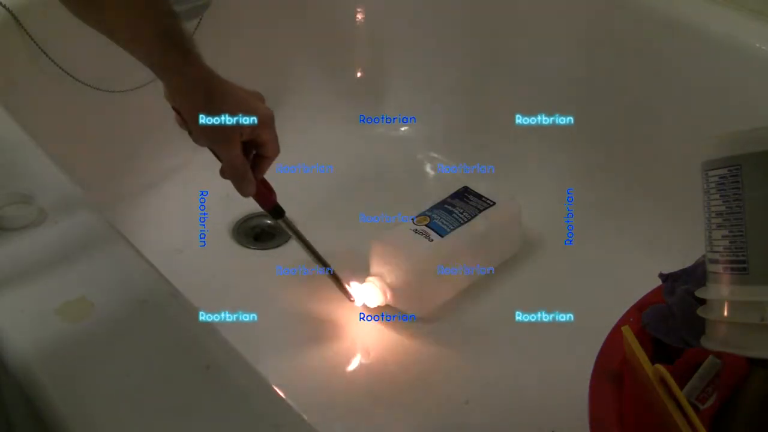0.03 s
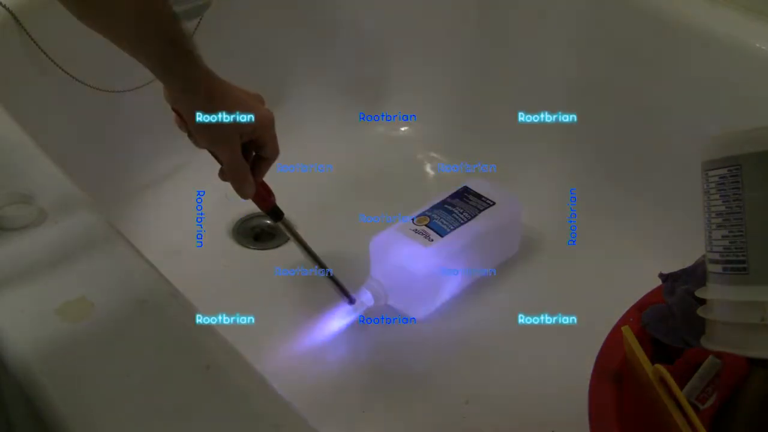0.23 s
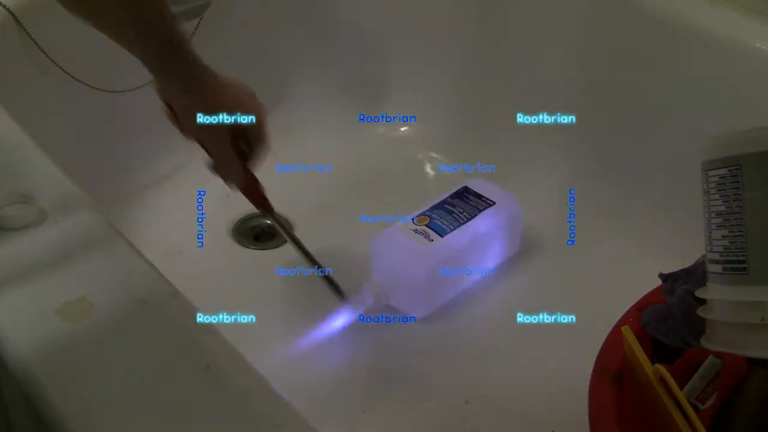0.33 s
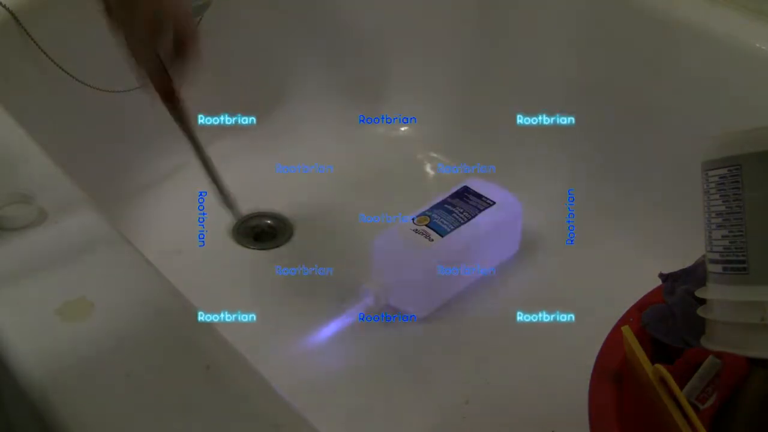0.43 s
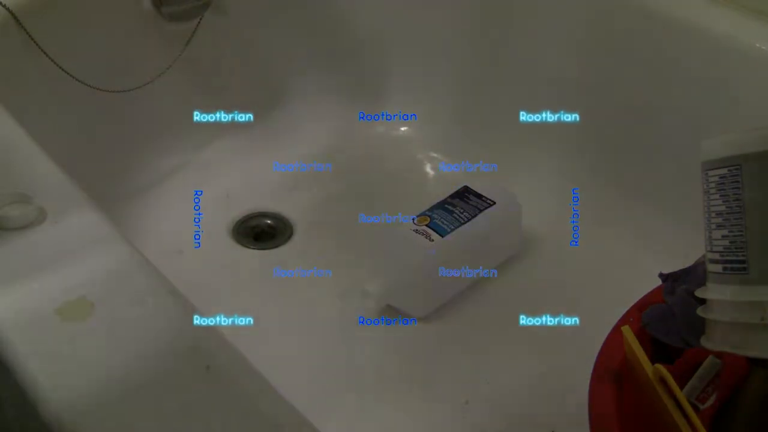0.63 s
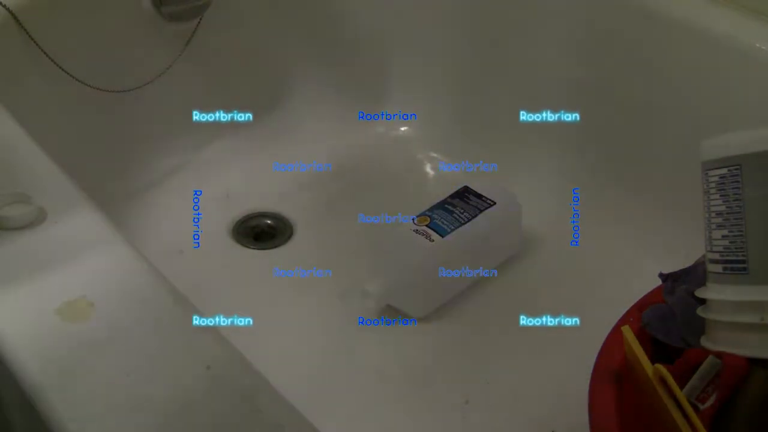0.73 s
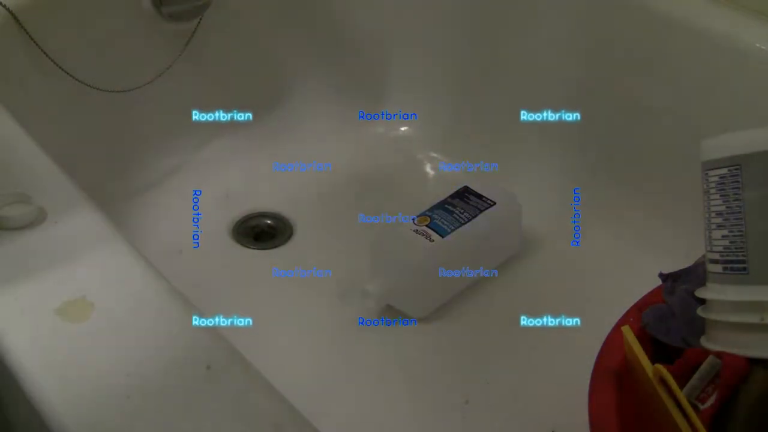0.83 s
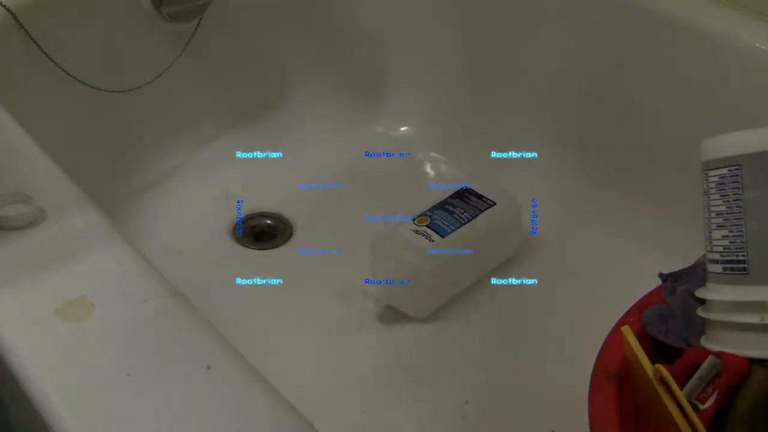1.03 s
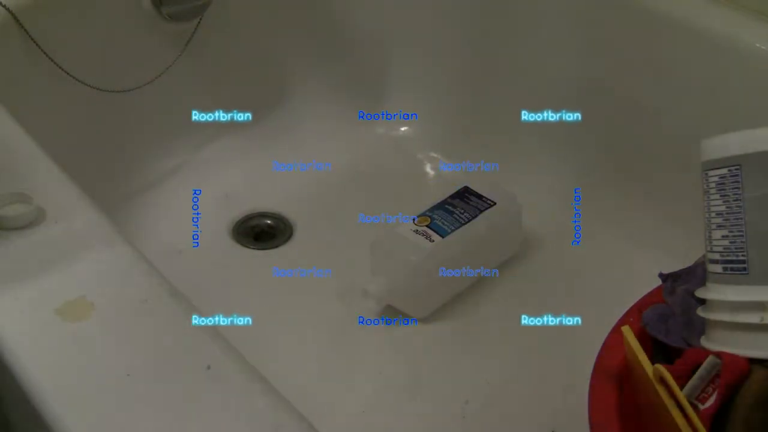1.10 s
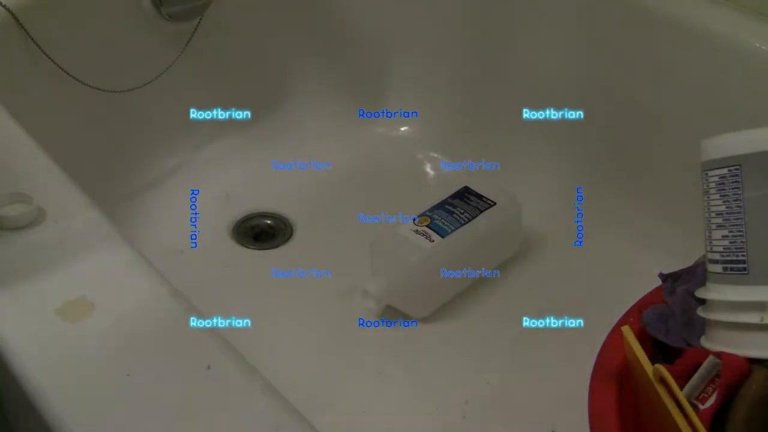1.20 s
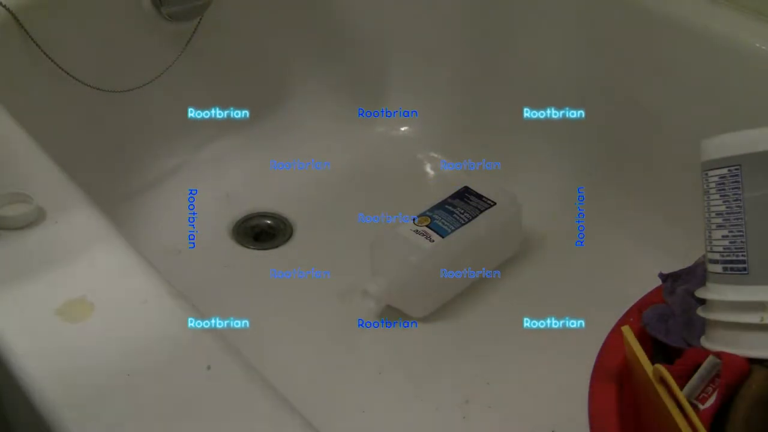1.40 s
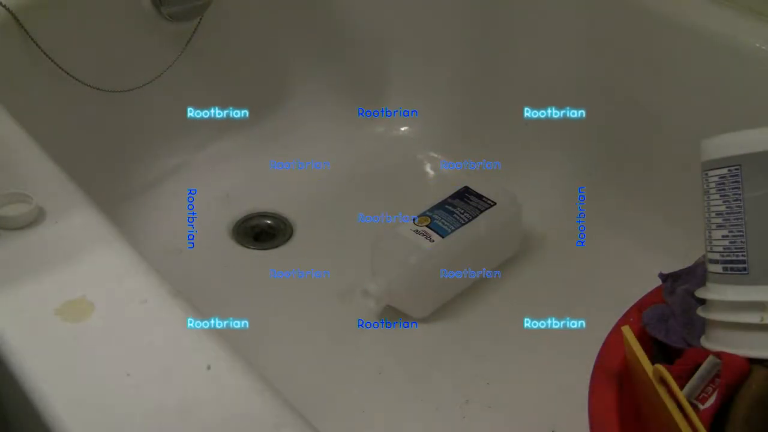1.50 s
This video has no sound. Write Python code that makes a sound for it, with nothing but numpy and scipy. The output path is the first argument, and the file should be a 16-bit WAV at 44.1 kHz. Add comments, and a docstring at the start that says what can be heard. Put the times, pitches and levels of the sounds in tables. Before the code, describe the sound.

A flame jet bursts from a plastic bottle at about 0.2 seconds, a low, hollow whoosh with a hissing edge that lasts a third of a second. The plastic clicks as it dies away around 0.5 seconds. Air hisses faintly back in near 0.75 seconds, and one sharper click comes just after 1 second. A fan hums quietly throughout in the small tiled bathroom.

```python
"""A flame jet roars for a third of a second as vapour ignites in a plastic bottle lying in a bathtub.
Just ahead of it come a tiny click and a faint hollow tone; then gas rushes from the neck and rings the
hollows of bottle and tub. The plastic clicks as it heats and cools, and air hisses faintly back in.
A fan hums in the small tiled room, and an automatic gain control ducks the mix under the roar."""
import sys
import numpy as np
from scipy import signal
from scipy.fft import rfft, irfft, next_fast_len
from scipy.io import wavfile
from scipy.ndimage import uniform_filter1d, map_coordinates

SR = 44100
rng = np.random.default_rng(int(sys.argv[2]) if len(sys.argv) > 2 else 0)


def unload_wav(signal):
    """Save mono or channel-first audio to the path in sys.argv[1] as 16-bit WAV at rate SR, clipped to [-1, 1]."""
    wavfile.write(
        sys.argv[1],
        SR,
        np.round(np.clip(np.atleast_2d(signal).T, -1, 1) * 32767).astype(np.int16),
    )


N = 68355

# Envelope of the flame jet: time_s, level_db
JET_FLOW = [(.197, -52), (.206, -22.5), (.216, -13), (.236, -9.5), (.26, -8.5), (.33, -8.5), (.425, -8.5),
            (.452, -9), (.495, -16.5), (.525, -34), (.57, -61)]
# Noise colours of the first push of gas, the roar and the hiss: frequency_hz, relative_db
BOOM_COLOUR = [(30, -41), (70, -7.5), (120, -8), (180, -14), (240, 3.5), (330, -0.5), (480, 0), (600, -8),
               (1000, -48)]
ROAR_COLOUR = [(150, -41), (400, -2), (700, -0.5), (900, 1), (1100, 2.5), (1200, -5), (1400, -1.5),
               (1720, -2), (1830, -14.5), (2300, -18.5), (3200, -16), (5000, -56)]
HISS_COLOUR = [(900, -26), (2000, 8), (2300, 1.5), (2550, 6), (2900, -2.5), (4200, -6), (5500, -8),
               (7500, -15.5), (9800, -26), (12500, -22.5), (16000, -28)]
# Air resonances of bottle and tub: pitch_hz, bandwidth_hz, relative_db, peak_s, half_span_s
HOLLOW_MODES = [(122.5, 12, -18, 0.272, 0.043), (105, 30, -18.5, 0.532, 0.083),
                (251, 24, -13, 0.374, 0.065), (218, 20, -12, .49, 0.033), (331.5, 28, -10.5, 0.25, .06),
                (445.7, 26, -10, 0.223, 0.044), (479.7, 26, -2, 0.531, 0.045),
                (586.5, 14, -6, 0.414, 0.038), (657, 17.83, -8, 0.37, 0.076),
                (682.4, 16.3, -6.5, 0.407, 0.025), (715, 14.14, -12, 0.39, .13),
                (798.6, 39, -14, 0.34, 0.095), (968, 14, -14.5, 0.33, .1), (995, 11.7, -16, 0.333, .08),
                (1049, 13.8, -18.5, 0.46, .12), (1377, 30, -17.5, .39, 0.099),
                (1434, 18.3, -18.5, 0.39, 0.08), (1670, 10, -13, .28, .11), (1980, 24, -24, 0.17, 0.14),
                (2490, 40, -22.5, 0.29, 0.11)]
# Clicks of the plastic: start_s, low_ring_db, middle_ring_db, high_ring_db, snap_db
PLASTIC_CLICKS = [(.111, -49, -55.5, -68, -53), (0.4662, -25, -29.5, -32, -25),
                  (0.5337, -26, -36.5, -48, -25), (0.5412, -31.5, -38, -52, -27),
                  (.774, -60, -54, -64, -43), (0.783, -66, -57, -62, -43), (0.9998, -46, -55, -66, -42),
                  (1.0592, -40.5, -41.5, -36.5, -19.5), (1.134, -60, -60, -52, -54),
                  (1.1407, -55, -49, -52, -49)]
# Modes of a click's opening snap: pitch_hz, relative_db, t60_s
SNAP_MODES = [(3250, -13, .008), (5200, -6, .001), (7000, -6, .001), (13800, -1, .0007)]
# Colours of a click's low, middle and high ring, one list each: frequency_hz, relative_db
RING_COLOURS = [
    [(1000, -35), (2000, -4), (2600, 2.5), (3250, -5), (4000, -0.5), (5400, -2.5), (7000, -24)],
    [(4500, -10.5), (6200, 4), (7700, -2), (9000, -13), (11000, -33)],
    [(8500, -19.5), (11000, -7.5), (13500, -4), (16000, -3.5)],
]
# Envelope of the air drawn back in: time_s, level_db
INRUSH_ENVELOPE = [(.6, -61), (.7, -52.5), (.775, -51), (.86, -58), (1, -59.5)]
# Colour of that air: frequency_hz, relative_db
AIR_COLOUR = [(1500, 2), (3500, -0.5), (7500, -5.5), (10000, -13.5), (15000, -16)]
# Colour of the fan's air noise: frequency_hz, relative_db
FAN_COLOUR = [(25, -17), (40, -26), (64, -5), (92, -14.5), (134, 0.5), (190, -10), (250, -3.5), (350, -9),
              (470, -11.5), (660, -9), (790, -12.5), (870, -16), (1150, -15), (1440, -22.5), (1650, -18.5),
              (2400, -26), (3520, -30), (5000, -32), (6920, -42.5), (9500, -46.5), (16000, -50)]
# Envelope of the fan's air noise: time_s, level_db
FAN_ENVELOPE = [(0, -41.5), (.7, -42), (1.15, -40), (1.55, -41.5)]
# Tones of the fan motor: pitch_hz, level_db
MOTOR_TONES = [(48.6, -42), (97, -52.5), (120, -48), (143, -50), (168, -51), (216.5, -51), (242, -51.5),
               (289.5, -52), (336, -55.5), (386, -52.5)]
# Stereo widths of jet and room, clicks and inrush, and fan: frequency_hz, side_minus_mid_db
JET_WIDTH = [(60, -9), (250, -17), (600, -15), (1400, -12.5), (3000, -10), (5500, -6.5), (8000, -2),
             (10000, 2), (11500, -16), (15000, -22)]
BOTTLE_WIDTH = [(2000, -12), (5000, -6.5), (8000, 2), (13000, -14)]
FAN_WIDTH = [(60, 8), (150, -10.5), (380, -9.5), (950, -8), (2380, -5.5), (5980, -1), (15000, 2)]
# Early echoes off the tub: delay_s, gain_db
TUB_ECHOES = [(.0015, -19.5), (.0031, -18.5), (.0062, -14), (.0087, -16.5), (0.0143, -19.5)]


def flame_jet():
    """One flow of burning gas drives boom, roar, hiss and hollows; boom and hiss fade ahead of the roar."""
    middle_s, hiss_lag_s, hollow_lag_s = 0.37, 0.013, 0.0031
    from_middle_s = np.clip(clock() - middle_s, -.2, .3)

    def layer(colour, trim_db, fade_db_per_s):
        return amp(trim_db - fade_db_per_s * from_middle_s) * noise(colour, JET_WIDTH)

    boom = layer(BOOM_COLOUR, trim_db=-12.5, fade_db_per_s=30)
    roar = layer(ROAR_COLOUR, trim_db=-7, fade_db_per_s=5.5)
    hiss = layer(HISS_COLOUR, trim_db=-15.5, fade_db_per_s=42)
    flow = amp(curve(JET_FLOW))
    hiss_flow = np.minimum(flow, lag(flow, hiss_lag_s))  # late attack: hiss needs the jet at full speed
    body = lag(flow, hollow_lag_s) * hollows()
    return flow * boom + body + tub_echoes(flow * roar + hiss_flow * hiss)


def hollows():
    """Turbulence rings the air in bottle and tub, each mode swelling at its own moment of the burn."""
    return sum(amp(db) * swell(peak_s, half_span_s) * wavering_tone(hz, bandwidth_hz, flutter_db=3.9)
               for hz, bandwidth_hz, db, peak_s, half_span_s in HOLLOW_MODES)


def ignition_tone():
    """A faint hollow tone swells just before the vapour catches."""
    envelope = amp(-46.5) * swell(peak_s=0.15, half_span_s=0.037)
    return envelope * wavering_tone(hz=388, bandwidth_hz=3, flutter_db=4)


def plastic_snaps():
    """The sharp attack of each click, straight from the bottle wall."""
    low_cut_hz = 2660
    out, t = np.zeros(N), np.arange(512) / SR
    snap = sum(amp(db - 60 * t / t60_s) * np.sin(2 * np.pi * hz * t) for hz, db, t60_s in SNAP_MODES)
    for start_s, *_, snap_db in PLASTIC_CLICKS:
        out[round(start_s * SR):][:len(t)] += amp(snap_db) * snap
    return signal.sosfilt(signal.butter(4, low_cut_hz, "high", fs=SR, output="sos"), out)


def plastic_rings():
    """Just behind each snap, a short crack in three noise bands rings away between the tub's walls."""
    delay_s, attack_s, crack_s, crack_over_tail_db, tail_t60_s = 0.00085, 0.00026, 0.003, 4, 0.15
    out = np.zeros((2, N))
    for band, colour in enumerate(RING_COLOURS):
        power = np.zeros(N)
        for start_s, *levels_db in PLASTIC_CLICKS:
            t = np.maximum(clock() - start_s - delay_s, 0)
            attack = 1 - np.exp(-t / attack_s)
            crack = amp(crack_over_tail_db) * np.exp(-t / crack_s)
            tail = amp(-60 * t / tail_t60_s)
            power += (amp(levels_db[band]) * attack * (crack + tail) / 2) ** 2
        out += np.sqrt(power) * noise(colour, BOTTLE_WIDTH)
    return out


def inrush():
    """The cooling bottle draws a thin hiss of air back through its neck."""
    return amp(curve(INRUSH_ENVELOPE)) * noise(AIR_COLOUR, BOTTLE_WIDTH)


def fan():
    """A bed of moving air and motor hum; the higher tones are less steady."""
    hum = sum(amp(db) * wavering_tone(hz, bandwidth_hz=hz * hz / 30000, flutter_db=hz / 250)
              for hz, db in MOTOR_TONES)
    return hum + amp(curve(FAN_ENVELOPE)) * noise(FAN_COLOUR, FAN_WIDTH)


def tub_echoes(x):
    """The direct sound, coloured by a few close reflections off the tub."""
    return filtered(x, lambda hz: 1 + sum(amp(db) * np.exp(-2j * np.pi * hz * delay_s)
                                          for delay_s, db in TUB_ECHOES))


def tiled_room(x):
    """The short, bright reverb of the tiles, wet only."""
    t60_s, predelay_s = 0.26, 0.004
    t = clock()
    wash = noise(colour=[(100, 0), (6000, -5), (16000, -7)], width=JET_WIDTH)
    tail = wash * amp(-60 * t / t60_s) * (t > predelay_s)
    return signal.fftconvolve(x, tail / np.linalg.norm(tail[0]), axes=1)[:, :N]


def noise(colour, width):
    """Stereo noise of a given colour and width, its mid channel at rms 1."""
    mid = filtered(rng.standard_normal(N), lambda hz: eq_gain(colour, hz))
    side = filtered(rng.standard_normal(N), lambda hz: eq_gain(colour, hz) * eq_gain(width, hz))
    return np.array([mid + side, mid - side]) / np.std(mid)


def wavering_tone(hz, bandwidth_hz, flutter_db):
    """A sine at rms 1 whose phase drifts and whose level flutters."""
    drift = np.cumsum(rng.standard_normal(N)) * np.sqrt(np.pi * bandwidth_hz / SR)
    phase = uniform_filter1d(drift, size=400) + rng.uniform(0, 2 * np.pi)
    flutter = map_coordinates(rng.standard_normal(2048), [clock() * 2 * bandwidth_hz], mode="wrap")
    tone = np.sin(2 * np.pi * hz * clock() + phase) * amp(flutter_db * flutter)
    return tone / np.sqrt(np.mean(tone ** 2) + 1e-20)


def swell(peak_s, half_span_s):
    """A rounded rise and fall, at half strength half_span_s either side of its peak."""
    return 1 / (1 + ((clock() - peak_s) / half_span_s) ** 4)


def lag(x, seconds):
    """Follow x with a time constant."""
    keep = np.exp(-1 / (seconds * SR))
    return signal.lfilter([1 - keep], [1, -keep], x)


def filtered(x, response):
    """Pass x through a frequency response."""
    size = next_fast_len(N + SR // 2)
    return irfft(rfft(x, size) * response(np.fft.rfftfreq(size, 1 / SR)), size)[..., :N]


def eq_gain(points, hz):
    """Gain of an EQ curve drawn through (frequency_hz, gain_db) points on a log axis."""
    points_hz, points_db = np.transpose(points)
    return amp(np.interp(np.log(hz + 1), np.log(points_hz + 1), points_db))


def curve(points):
    """Automation: (time_s, value) points joined by lines."""
    return np.interp(clock(), *np.transpose(points))


def clock():
    """Time of every sample in seconds."""
    return np.arange(N) / SR


def amp(db):
    """Decibels to gain."""
    return 10 ** (np.asarray(db) / 20)


def scene():
    """The jet and its reverb over clicks, inrush and fan, all panned a touch to the right."""
    reverb_db, pan_db = -9.5, 0.4
    jet = ignition_tone() + flame_jet()
    reverb = amp(reverb_db) * tiled_room(jet)
    clicks = tub_echoes(plastic_snaps()) + plastic_rings()
    return (jet + reverb + clicks + inrush() + fan()) * amp([[-pan_db], [pan_db]])


def record(dry):
    """Automatic gain control ducks the loud part and recovers; a steep high cut follows."""
    threshold_db, duck_db_per_db, response_s, high_cut_hz = -20.5, 0.46, 0.069, 15950
    power = uniform_filter1d(np.mean(dry ** 2, axis=0), size=440)  # 10 ms window
    level_db = 10 * np.log10(np.abs(power) + 1e-12)
    duck_db = lag(duck_db_per_db * np.maximum(level_db - threshold_db, 0), response_s)
    return filtered(dry * amp(-duck_db), lambda hz: hz < high_cut_hz)


dry = scene()
out = record(dry)
unload_wav(out)
```